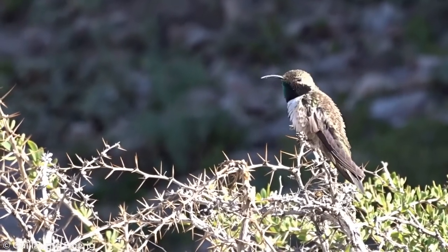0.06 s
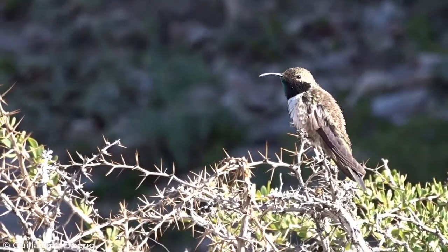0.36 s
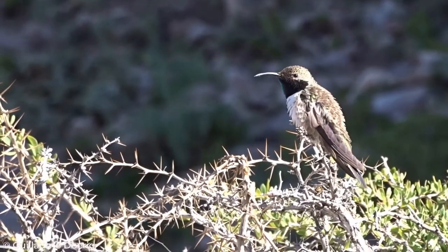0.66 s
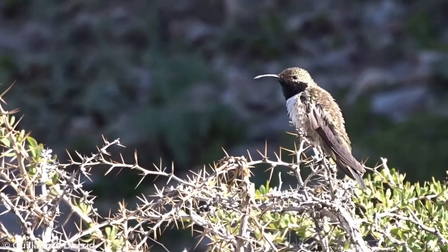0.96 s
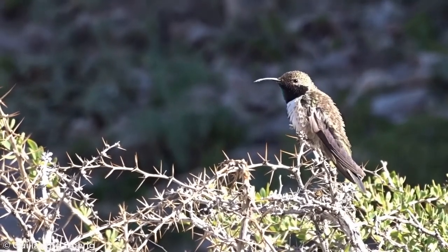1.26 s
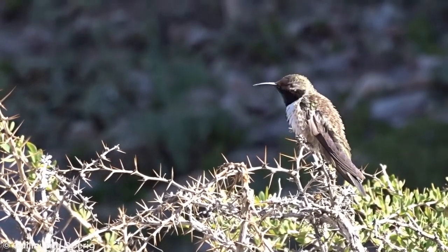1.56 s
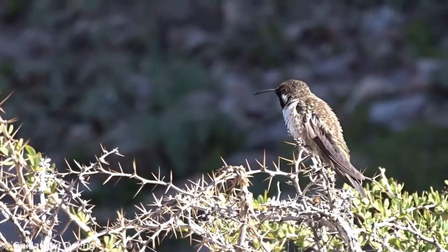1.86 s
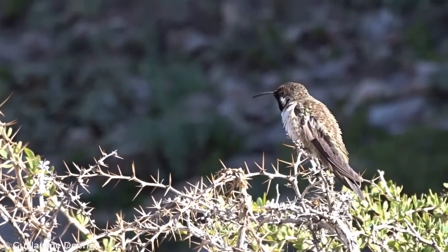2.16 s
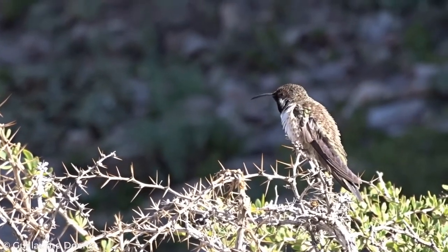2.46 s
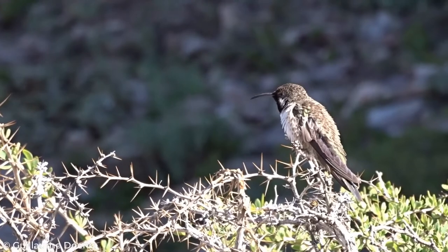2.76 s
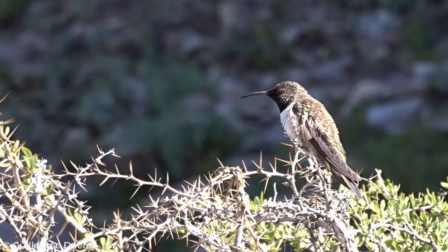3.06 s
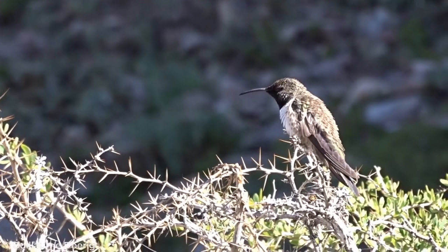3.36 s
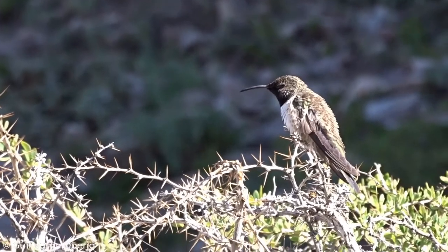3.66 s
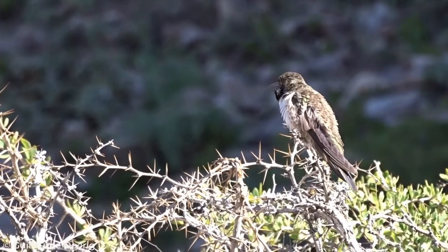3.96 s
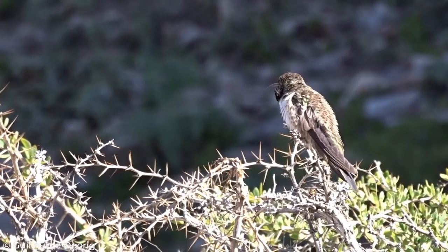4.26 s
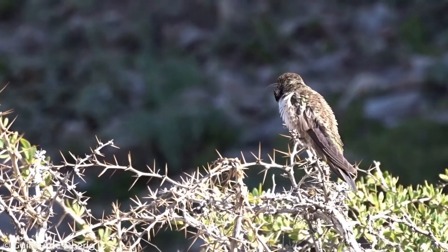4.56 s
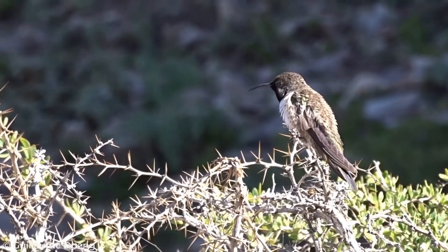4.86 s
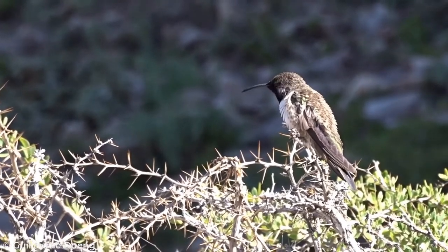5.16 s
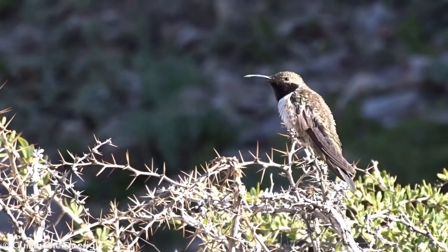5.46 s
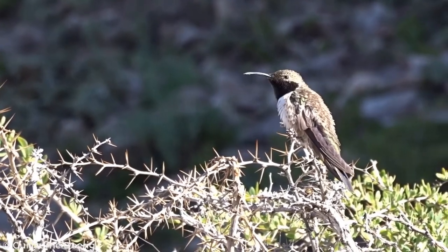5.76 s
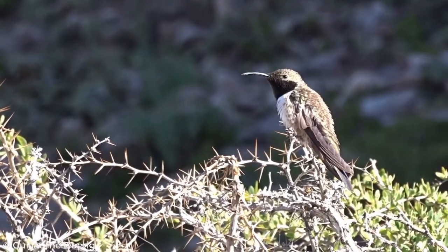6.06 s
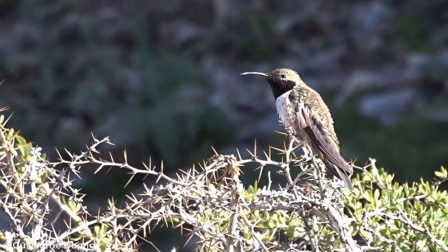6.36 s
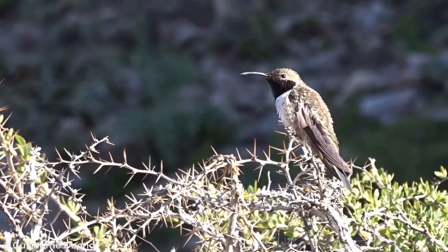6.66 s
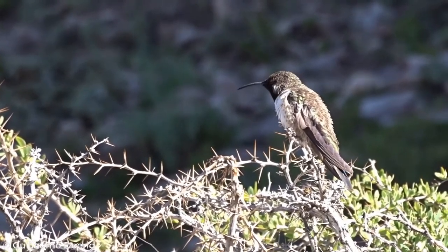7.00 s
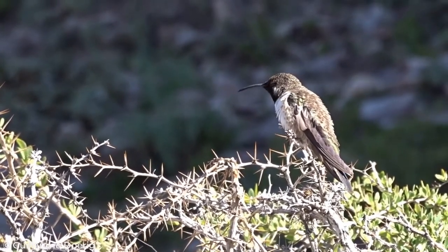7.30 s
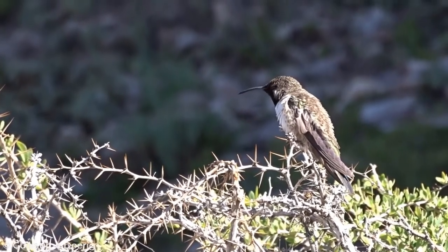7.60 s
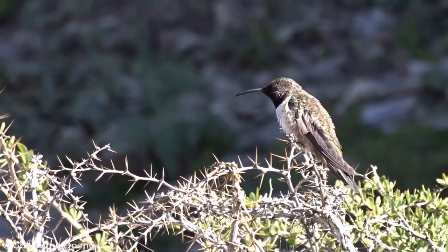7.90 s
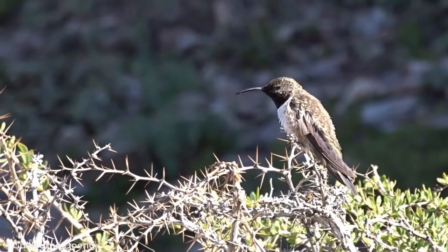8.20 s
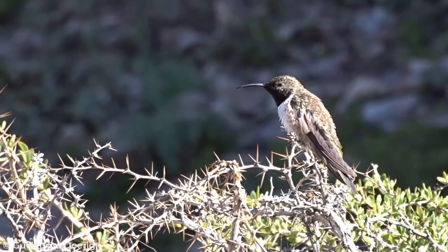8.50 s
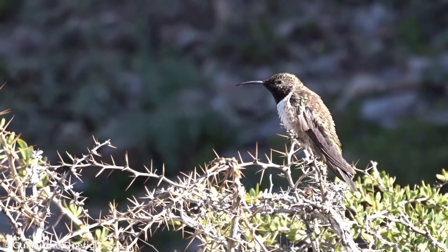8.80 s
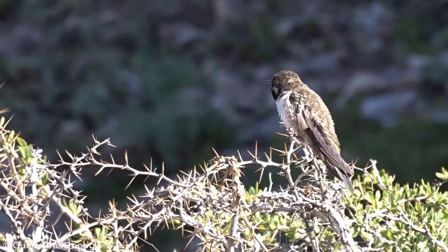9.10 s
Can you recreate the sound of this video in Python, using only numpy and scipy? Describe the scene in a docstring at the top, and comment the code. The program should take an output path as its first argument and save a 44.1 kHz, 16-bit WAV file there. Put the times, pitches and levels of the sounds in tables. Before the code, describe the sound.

Wind rumbles and buffets the microphone outdoors, easing as a nearby hummingbird gives a rapid, high twitter among faint far-off bird calls.

```python
"""Gusts rumble and slap on the microphone over the even rush of a valley, with thin chips and blurred
whistles from birds up the rocky slope. A few dry ticks sound close by. Near 4 s, as the wind drops, a
hummingbird sings two seconds of fast, squeaky chatter with both sides of its syrinx, and the slope
throws back a faint echo. The gusts return, a low moan comes and goes, and at 9 s the bird starts again."""
import sys
import numpy as np
from scipy import signal
from scipy.fft import rfft, irfft
from scipy.io import wavfile
from scipy.ndimage import uniform_filter1d, map_coordinates

SR = 44100
rng = np.random.default_rng(int(sys.argv[2]) if len(sys.argv) > 2 else 0)


def int16_out(signal):
    """Quantize to a 16-bit WAV file."""
    q = np.round(np.clip(np.atleast_2d(signal).T, -1, 1) * 32767)
    wavfile.write(sys.argv[1], SR, q.astype(np.int16))


N = 411894
TIME = np.arange(N) / SR
BINS = np.fft.rfftfreq(N, 1 / SR)


def gain_of(db):
    """Decibels to amplitude."""
    return 10 ** (np.asarray(db) / 20)


def spectrum(points):
    """Draws a curve over the frequency bins, on a log frequency scale."""
    hz, value = np.transpose(points)
    return np.interp(np.log(BINS + 1), np.log(hz + 1), value)


def band_db(hz, half_width_hz, order):
    """A band-pass curve in dB over the frequency bins."""
    return -20 * np.log10(1 + ((BINS - hz) / half_width_hz) ** order)


def automation(points):
    """Draws a curve through timed points, at every sample."""
    return np.interp(TIME, *np.transpose(points))


def add(mix, s, sound):
    """Mixes a sound in at s seconds."""
    part = mix[max(round(s * SR), 0):][:len(sound)]
    part += sound[:len(part)]


def panned(x, balance_db):
    """Places a mono sound by its level difference, left minus right."""
    return x * gain_of([[balance_db / 2], [-balance_db / 2]])


def wander(size, per_s):
    """Smooth random modulation of about unit size."""
    knots = rng.standard_normal(int(size / SR * per_s) + 3)
    return map_coordinates(knots, [np.arange(size) * per_s / SR], order=3, mode="nearest")


def unit_rms(x):
    """Scales to an rms of one."""
    return x / np.sqrt(np.mean(x ** 2) + 1e-20)


def steadied(x, window_s):
    """Evens out the slow swell of a noise and keeps its quick lumps."""
    return x / np.sqrt(uniform_filter1d((x ** 2).mean(0), int(window_s * SR)) + 1e-9)


def stereo_noise(eq_db, likeness, balance_db=0, phase=0):
    """Coloured noise on two microphone ports that partly hear the same air."""
    shared, own = rfft(rng.standard_normal((2, N)))
    likeness = np.clip(likeness, -1, 1)
    left = shared * gain_of(balance_db) * np.exp(1j * phase)
    right = likeness * shared + np.sqrt(1 - likeness ** 2) * own
    return unit_rms(irfft(np.array([left, right]) * gain_of(eq_db), N))


def scatter(x, delay_s, t60_s):
    """Many small reflections from rocks and bushes, different on each side."""
    t = np.arange(SR // 2) / SR
    taps = rng.standard_normal((2, len(t))) * (rng.random((2, len(t))) < .1)
    taps *= (t > delay_s) * gain_of(-60 * t / t60_s)
    taps /= np.linalg.norm(taps, axis=1, keepdims=True) + 1e-12
    return signal.oaconvolve(x[None], taps, axes=1)[:, :N]


def valley(rush_db=-62, flutter_db=.88, body_hz=650):
    """The bed: a steady distant rush whose low half sinks in the lull, with a low moan late on."""
    # tone of the rush: (frequency [Hz], level [dB])
    rush_eq = [(60, -4.5), (250, 1), (480, -3), (800, 0), (1080, -8), (1500, -11.5), (1900, -19.5),
               (2550, -17.5), (3100, -14.5), (3600, -19), (4200, -19.5), (5200, -24.5), (5900, -24.5),
               (6450, -29), (8200, -26.5), (10000, -21), (11000, -23)]
    # its hollow resonances: (centre [Hz], width [Hz], boost [dB])
    hollows = [(580, 24, 6.6), (828, 110, 2.5), (1317, 85, 6.1), (2272, 150, 5.4)]
    # its stereo width: (frequency [Hz], left-right likeness [0-1])
    likeness = [(60, 0.71), (270, 0.69), (560, 0.59), (2400, 0.13), (5200, 0.99), (10900, 1)]
    # its pan: (frequency [Hz], left minus right [dB])
    balance = [(140, -5), (340, 1), (810, -1), (1920, 3.5), (4570, -2), (6500, -0.5)]
    # its phase between the sides: (frequency [Hz], left lead [rad])
    phase = [(100, -1.14), (600, -1.21), (850, -1.06), (2200, -1.99), (4500, -1.34), (6500, -0.27)]
    # fader on the whole rush: (time [s], gain [dB])
    swell = [(0, 2), (2.3, 2), (3.9, 0.8), (4.7, 0.5), (6.4, .5), (9.34, 1)]
    # fader on its low half: (time [s], gain [dB])
    body_fader = [(0, 0), (4.15, 1.5), (4.45, -4.5), (5.3, 0), (6.5, 1.5), (9.34, 0.5)]
    # fader on the moan: (time [s], level [dB])
    moan_fader = [(7.4, -90), (7.7, -62), (8.05, -60), (8.25, -68.5), (8.9, -85), (9.2, -61)]
    hollows_db = sum(db * np.exp(-((BINS - hz) / width) ** 2) for hz, width, db in hollows)
    eq_db = spectrum(rush_eq) + hollows_db
    rush = stereo_noise(eq_db, spectrum(likeness), spectrum(balance), spectrum(phase))
    body = irfft(rfft(rush) / (1 + (BINS / body_hz) ** 6), N)
    rush += body * (gain_of(automation(body_fader)) - 1)
    moan = stereo_noise(band_db(hz=330, half_width_hz=70, order=2), likeness=.86)
    level_db = rush_db + automation(swell) + flutter_db * wander(N, 12)
    return rush * gain_of(level_db) + moan * gain_of(automation(moan_fader))


def wind(eddies_db=-.5, steepness=.38, lurch_db=1.5):
    """Slow buffets push on the microphone; finer eddies break off in bursts, more so in a strong gust."""
    # strength of the gusts: (time [s], level [dB])
    gusts = [(0.0, -41), (.17, -41), (.22, -44.5), (0.37, -50.5), (.44, -40), (.53, -48), (.6, -36),
             (0.7, -39), (0.75, -42.5), (1.05, -40), (1.17, -44.5), (1.29, -34.5), (1.36, -37),
             (2.47, -37.5), (2.55, -43), (3.3, -41.5), (3.57, -59), (3.88, -52.5), (4.0, -56), (4.07, -48),
             (4.23, -53), (4.32, -43), (4.41, -57), (4.51, -60), (4.58, -48), (4.69, -58.5), (4.83, -49),
             (4.88, -55.5), (4.92, -45), (5.04, -51), (5.32, -41.5), (5.38, -52), (5.54, -36.5),
             (5.59, -48.5), (5.73, -45.5), (5.87, -53), (5.94, -44), (6.14, -38), (6.32, -49), (6.58, -38),
             (6.68, -54), (6.97, -43), (7.41, -48.5), (7.93, -42), (8.04, -49), (8.25, -53.5), (8.3, -41),
             (8.42, -36.5), (8.47, -53), (8.55, -43), (8.6, -49.5), (8.76, -50.5), (9.0, -34.5),
             (9.08, -49.5), (9.34, -55)]
    # tone of the deep buffet: (frequency [Hz], level [dB])
    buffet_eq = [(10, -23), (24, 5), (38, 4), (60, 5.5), (114, -5), (190, -21.5), (400, -74.5)]
    # tone of the eddies: (frequency [Hz], level [dB])
    eddy_eq = [(50, -8.5), (105, 2.5), (150, 2), (200, -5), (280, -17), (450, -20.5), (800, -39),
               (1600, -43.5), (4000, -83)]
    # how finely the wind breaks up: (time [s], gain of the eddies [dB])
    turbulence = [(0, -12.5), (.45, -9), (.64, -2), (1.0, -6.5), (1.28, -16), (1.5, -4.5), (3.3, -4.5),
                  (3.9, -13), (4.2, -28), (5.4, -27), (5.54, -17), (5.8, -26), (6.17, -11), (6.4, -20),
                  (6.62, -12.5), (7.2, -26), (7.55, -2), (8.02, -4), (8.2, -8), (8.42, -18.5), (8.55, -1),
                  (8.65, -16), (9, -18)]
    # the same air reaches both ports: (frequency [Hz], left-right likeness [0-1])
    port_likeness = [(25, 0.78), (65, 0.9), (110, 0.65), (250, 0.89), (500, 0.79), (1000, 0.15)]
    # it reaches the right one first: (frequency [Hz], left lead [rad])
    port_phase = [(25, 0.05), (65, -0.29), (110, -1), (200, -1.53), (330, -2), (600, -2.5)]
    gust_db = automation(gusts) + lurch_db * wander(N, per_s=24)
    likeness, phase = spectrum(port_likeness), spectrum(port_phase)
    buffet = stereo_noise(spectrum(buffet_eq), likeness, balance_db=2, phase=phase)
    buffet = steadied(buffet, window_s=.06)
    bursts = gain_of(2.2 * buffet.mean(0) + 4 * wander(N, 90))
    eddies = steadied(stereo_noise(spectrum(eddy_eq), likeness, phase=phase) * bursts, window_s=.1)
    fine_db = automation(turbulence) + eddies_db + steepness * (gust_db - gust_db.mean())
    return gain_of(gust_db) * (buffet + eddies * gain_of(fine_db))


def wind_slaps(top_hz=1200, left_late_s=.00067, quickest_s=.00096, big_db=-27):
    """A sharp eddy hits the right port, then the left: a quick push and a slower pull."""
    # eddies that slap the microphone: (time [s], level [dB])
    hits = [(.617, -35), (.679, -27.5), (.698, -29), (1.293, -22.5), (1.483, -28.5), (1.577, -32),
            (1.74, -29.5), (1.878, -27), (2.028, -30), (2.193, -27.5), (2.333, -31.5), (2.862, -35),
            (2.929, -37), (3.045, -30), (3.179, -33), (6.134, -45), (7.838, -38.5), (8.547, -35.5)]
    t, out = np.arange(SR // 20) / SR, np.zeros((2, N))
    for s, db in hits:
        size = gain_of(db - big_db) ** 2  # bigger slaps are rounder and deeper
        roundness = max(size, 1)
        age = t / (quickest_s * (1 + size))
        push = age ** roundness * (roundness + 1 - age) * np.exp(-age)
        for port, late_s in zip(out, (left_late_s, 0)):
            add(port, s + late_s, gain_of(db) * push / push.max())
    return irfft(rfft(out) / (1 + (BINS / top_hz) ** 4), N)


def dry_ticks(crack_db=-4, rise_s=.00076):
    """Each tick is a quickly damped ping in a wide, noisy crack, over a small hollow knock."""
    # close ticks: (time [s], level [dB], pitch [Hz], decay [s], knock gain [dB], noisiness [0-1])
    hits = [(1.64, -64.5, 4000, .005, -8, 1), (2.06, -63, 3340, .004, -5, .4),
            (2.532, -51.5, 8440, .0019, -32, 1), (2.8583, -50, 3130, .002, -9, 0.3),
            (2.869, -63, 3160, .003, -9, .25), (4.7725, -37, 3470, 0.0019, -9, 0.83)]
    # resonances of the knock: (frequency [Hz], level [dB], t60 [s])
    knock_modes = [(290, 3.5, 0.02), (470, -0.5, 0.035), (920, 4.5, 0.03), (1320, 11.5, 0.03),
                   (2360, -7, 0.067), (4100, -13, .025)]
    t, out = np.arange(SR // 10) / SR, np.zeros(N)
    bins = np.fft.rfftfreq(len(t), 1 / SR)
    knock = sum(gain_of(db - 60 * t / t60) * np.sin(2 * np.pi * (hz * t + rng.random()))
                for hz, db, t60 in knock_modes)
    attack = np.minimum(t / rise_s, 1)
    for s, db, hz, decay_s, knock_db, noisiness in hits:
        pitch = hz * (1 + .093 * noisiness * wander(len(t), hz / 2))
        ping = np.sin(2 * np.pi * np.cumsum(pitch) / SR)
        crack = unit_rms(irfft(rfft(rng.standard_normal(len(t))) / (1 + ((bins / hz - 1) / .6) ** 2)))
        decay = np.exp(-np.maximum(t - rise_s, 0) / decay_s)
        snap = (ping + noisiness * gain_of(crack_db) * crack) * decay
        add(out, s, gain_of(db) * attack * (snap + .5 * gain_of(knock_db) * knock))
    return panned(out, balance_db=-4.5)


def syrinx_note(gesture, length, hz, db, hoarse, jitter=.0115, shimmer=.24, rasp=.06, overtone_db=-21):
    """One side of the syrinx: a slightly raspy tone bent through its gesture, sometimes quivering."""
    # contour of each gesture: (position in the note [0-1], pitch [factor], level [dB])
    contours = { "hook": [(0, .92, -15), (.25, .99, -4), (.55, 1, -1), (.7, .85, -4), (1, .62, -9)],
                "crest": [(0, .74, -12), (.17, 1, -4), (.6, 1.04, -1), (.75, .97, 2), (1, .93, -4)],
                "flat": [(0, 1.01, -5), (.3, 1, 0), (.8, 1, 0), (1, .99, -6)], "arch": [(0, .8, -12),
                (.12, .93, -7), (.45, 1, -6), (.62, .99, -7), (.72, .75, 3), (.8, .6, -8), (.88, .44, -7),
                (1, .35, -18)], "drop": [(0, 1.02, -2), (.18, .98, 1), (.35, .72, -11), (.55, .59, -8),
                (1, .53, -18)], "rise": [(0, .87, -7), (.5, .97, 0), (1, 1.15, -3)], "fall": [(0, 1.07, -7),
                (.5, 1, 0), (1, .9, -7)], "slur": [(0, 1.1, -12), (.08, 1.3, -4), (.22, 1.08, 1),
                (.42, 1.01, 0), (.88, .94, -3), (1, .93, -11)], "sweep": [(0, .72, -7), (.15, .89, -1),
                (.4, .98, 0), (.72, 1.04, -2), (.82, 1.05, -8), (1, .75, -18)], "pips": [(0, .93, -8),
                (.3, .96, -2), (.8, .99, -1), (1, 1, -4)], "buzz": [(0, .96, -2), (.3, 1, 0), (.75, 1, -1),
                (1, 1, -6)], "rattle": [(0, .98, -2), (.3, .99, 0), (.8, 1, -1), (1, 1.03, -4)],
                "peep": [(0, .8, -10), (.45, 1.02, 0), (1, .85, -7)], "peal": [(0, .98, -6), (.15, 1, 0),
                (.78, 1, 0), (.86, .85, -8), (.9, .58, -4), (1, .45, -8)], "chip": [(0, .97, -9),
                (.5, 1.01, 0), (.6, 1, 0), (.72, .7, -7), (.85, .46, -9), (1, .3, -17)],
                "dip": [(0, 1.14, -3), (.5, .87, 0), (.8, 1.24, -1), (1, 1.2, -9)]}
    # gestures that quiver: (first rate [beats/s], last rate [beats/s], pitch swing [share], dip [dB])
    quivers = {"pips": (150, 105, .2, 34), "rattle": (175, 125, .1, 26), "buzz": (195, 150, .05, 14),
               "crest": (330, 300, .05, 4)}
    t = np.arange(0, length, 1 / SR)
    position, bend, shape_db = np.transpose(contours[gesture])
    pitch = hz * uniform_filter1d(np.interp(t / length, position, bend), size=40)
    level_db = db + np.interp(t / length, position, shape_db)
    if gesture in quivers:
        first, last, swing, dip_db = quivers[gesture]
        rate = np.linspace(first, last, len(t)) * (1 + .1 * wander(len(t), first))
        beat = abs(np.sin(np.pi * np.cumsum(rate) / SR))
        pitch *= 1 + 2 * swing * (beat - 2 / np.pi)  # each beat is a little arch, loudest on top
        pitch *= 1 + (.01 + .035 * (1 - beat)) * wander(len(t), 1400)  # hoarse between beats
        level_db = level_db - dip_db * (1 - beat) ** 2 + 2 * wander(len(t), first)
    pitch *= 1 + hoarse * jitter * wander(len(t), 1500)
    phase = 2 * np.pi * np.cumsum(pitch) / SR
    fades = np.sin(np.pi / 2 * np.clip(np.minimum(t, length - t) / .001, 0, 1))
    overtone = gain_of(overtone_db) * np.sin(2 * phase) * (pitch < SR / 4)
    flutter = 1 + shimmer * wander(len(t), 618) + hoarse * rasp * wander(len(t), 3000)
    return gain_of(level_db) * fades * flutter * (np.sin(phase) + overtone)


def sing(notes, hoarse_per_db=0, hoarse_below_db=-46, pitch_spread=.004, spread_db=1.36):
    """Plays notes, never twice quite alike. Soft ones can turn hoarse; held whistles stay purer."""
    out = np.zeros(N)
    for (s, gesture, length, hz, db), (sharp, loud) in zip(notes, rng.standard_normal((len(notes), 2))):
        softness_db = max(hoarse_below_db - db, 0)
        hoarse = .7 if gesture in ("flat", "peal") else 1.5 + hoarse_per_db * softness_db
        pitch = hz * (1 + pitch_spread * sharp)
        add(out, s, syrinx_note(gesture, length, pitch, db + spread_db * loud, hoarse))
    return out


def wavered(x, sway_s, sways_per_s, flicker_db):
    """A far call wavers in pitch and flickers in level, so that it breaks up."""
    shift = sway_s * SR * wander(N, sways_per_s)
    warped = map_coordinates(x, [np.arange(N) + shift], order=3)
    return warped * gain_of(flicker_db * wander(N, sways_per_s))


def far_birds(echo_db=-9):
    """The farther the bird, the more of its call arrives as echo, and the more it wavers."""
    # birds up the slope: (time [s], gesture, length [s], pitch [Hz], level [dB])
    chip_notes = [ (.256, "chip", .036, 5700, -66), (1.46, "chip", 0.06, 5730, -74.5),
                  (1.686, "chip", 0.043, 5990, -64), (2.647, "chip", 0.042, 5930, -67),
                  (3.083, "peep", 0.021, 3430, -63), (3.278, "flat", 0.019, 5930, -75.5),
                  (3.49, "dip", 0.083, 2670, -68), (4.47, "rise", 0.037, 5800, -66),
                  (5.72, "fall", .09, 946, -62.5), (6.115, "flat", 0.022, 5680, -74),
                  (7.178, "flat", .026, 5900, -78)]
    # whistles so distant that they blur: (time [s], gesture, length [s], pitch [Hz], level [dB])
    whistle_notes = [(0, "fall", 0.064, 3750, -68), (.1, "flat", 0.058, 3090, -71),
                     (.33, "buzz", 0.198, 4130, -68.5), (.62, "flat", 0.22, 5630, -78),
                     (1.04, "flat", 0.19, 5720, -73.5), (2.32, "fall", 0.049, 1543, -63),
                     (3.68, "buzz", 0.14, 4530, -74), (7.9, "pips", 0.12, 3200, -69),
                     (8.15, "fall", .17, 4090, -72.5), (8.32, "fall", 0.14, 3120, -71.5),
                     (8.58, "buzz", .21, 4250, -75), (8.97, "pips", 0.19, 4000, -63),
                     (9.18, "pips", 0.18, 3560, -67)]
    chips = wavered(sing(chip_notes), sway_s=.000008, sways_per_s=330, flicker_db=3)
    whistles = sing(whistle_notes, hoarse_per_db=.06)
    whistles = wavered(whistles, sway_s=.00006, sways_per_s=130, flicker_db=3.5)
    echo = gain_of(echo_db) * scatter(chips, delay_s=.05, t60_s=.47)
    blur = scatter(whistles, delay_s=.0027, t60_s=.17)
    return panned(chips, balance_db=6) + echo + blur


def placed(part, start, level_db, upper_db=0, pitch=1, stretch=1, upper_voice_hz=5600):
    """Cues one part of the song with its own level, balance of the two voices, pitch and pace."""
    return [(start + s * stretch, gesture, length * stretch, hz * pitch,
             level_db + db + upper_db * (hz > upper_voice_hz))
            for s, gesture, length, hz, db in part]


def chatter():
    """The hummingbird's score; overlapping notes are the two voices of one bird."""
    # where each song starts: (time [s], level [dB])
    song_starts = [(3.828, -61), (8.992, -59.5)]
    # its soft lead-in: (offset [s], gesture, length [s], pitch [Hz], relative level [dB])
    lead_in = [(0, "flat", 0.031, 4510, -1.5), (0, "rattle", 0.052, 4060, -4),
               (.035, "pips", 0.035, 4330, -4.5), (.068, "flat", 0.025, 2775, -10.5),
               (.095, "fall", .01, 3900, -3), (.106, "buzz", 0.031, 4800, -4),
               (.106, "pips", 0.045, 3280, -2)]
    # a phrase is an opening, one of three turns, and a closing; columns as in the lead-in
    opening = [(0, "hook", .02, 7360, -4.5), (.008, "pips", .0467, 3890, -1.5),
               (.019, "crest", .014, 7130, 0.5), (.035, "flat", .014, 6070, -3.5)]
    turns = { "squeal": [(.052, "arch", 0.027, 9570, -3), (.056, "flat", 0.016, 6680, 0.5),
             (.073, "drop", .017, 6900, 0.5), (.112, "rise", 0.0102, 4490, -4.5)],
             "slide": [(.057, "fall", 0.0052, 7200, -1), (.06, "fall", 0.018, 4930, -0.5)],
             "hold": [(.05, "flat", 0.026, 4080, -.5)]}
    closing = [(0.00064, "slur", 0.0214, 3910, 0), (.006, "sweep", 0.021, 7440, -8.5),
               (.027, "fall", 0.011, 4520, -3), (0.038, "peep", 0.0056, 6330, -8.5),
               (.039, "buzz", 0.043, 5140, -6.5), (.038, "rattle", 0.0449, 3442, -6.5)]
    # for each turn: (offset of the closing in the phrase [s])
    closes_after_s = {"squeal": .124, "slide": .077, "hold": .075}
    # phrases swell, then tire: (time [s], turn, opening level [dB], closing level [dB],
    # upper voice gain [dB], pitch [factor], closing length [factor])
    phrases = [(4.030, "squeal", -63.5, -58, 2.5, 1.004, 0.93),
               (4.271, "squeal", -52.5, -51.5, -0.5, 1.01, 1.06),
               (4.513, "slide", -51.5, -50.5, 0, 1.013, 0.92),
               (4.707, "hold", -49.5, -48.5, 2.5, 1.025, .87),
               (4.897, "squeal", -45.5, -43.5, 1.5, 1.015, 0.97),
               (5.140, "hold", -45.5, -51.5, -1.5, 0.97, 0.8), (5.330, "slide", -49.5, -47, -3, .98, .9),
               (5.531, "hold", -54, -53, -4.5, 0.95, 0.99),
               (9.184, "squeal", -56.5, -56, -17.5, 0.97, 1.03)]
    # a thin whistle ends the first song: (time [s], gesture, length [s], pitch [Hz], level [dB])
    end_whistle = (5.754, "peal", .062, 6200, -62.5)
    notes = [end_whistle]
    for s, db in song_starts:
        notes += placed(lead_in, s, db)
    for s, turn, opening_db, closing_db, upper_db, pitch, stretch in phrases:
        notes += placed(opening + turns[turn], s, opening_db, upper_db, pitch)
        notes += placed(closing, s + closes_after_s[turn], closing_db, upper_db, pitch, stretch)
    return notes


def hummingbird(hiss_db=-17, ground_db=-10.5, echo_db=-16, wash_db=-13.5):
    """The near, airy song rings briefly off twigs and stones; the slope returns an echo and a wash."""
    song = sing(chatter(), hoarse_per_db=.09)
    envelope = uniform_filter1d(abs(song), size=80)
    hiss = stereo_noise(band_db(hz=6200, half_width_hz=3000, order=4), likeness=1)[0]
    blur = stereo_noise(band_db(hz=4200, half_width_hz=1200, order=4), likeness=1)[0]
    song += gain_of(hiss_db) * hiss * envelope
    ground = gain_of(ground_db) * scatter(song, delay_s=.001, t60_s=.11)
    echo = gain_of(echo_db) * scatter(song, delay_s=.038, t60_s=.71)
    wash = gain_of(wash_db) * scatter(blur * envelope, delay_s=.004, t60_s=1.1)
    return panned(song + ground, balance_db=-4) + echo + wash


def scene():
    """Birds and ticks over moving air."""
    return hummingbird() + far_birds() + dry_ticks() + wind() + wind_slaps() + valley()


def record(dry):
    """A steep low-pass takes off the top octave."""
    low_pass = signal.firwin(511, cutoff=11070, window=("kaiser", 9), fs=SR)
    return signal.oaconvolve(dry, low_pass[None], "same")


dry = scene()
out = record(dry)
int16_out(out)
```